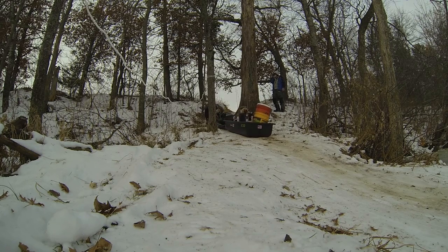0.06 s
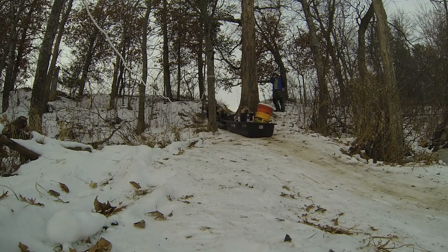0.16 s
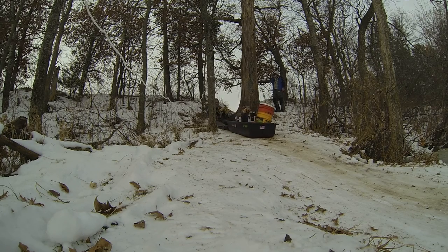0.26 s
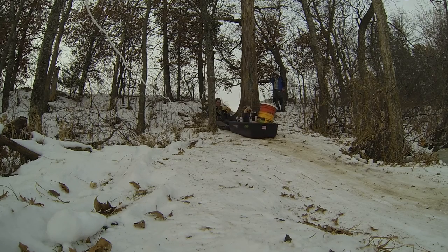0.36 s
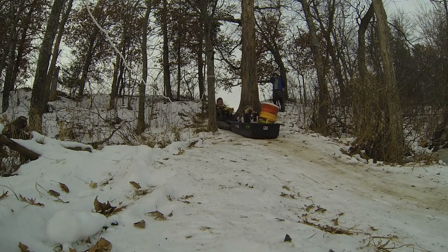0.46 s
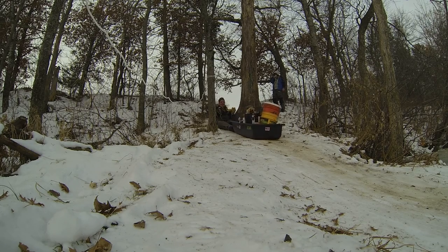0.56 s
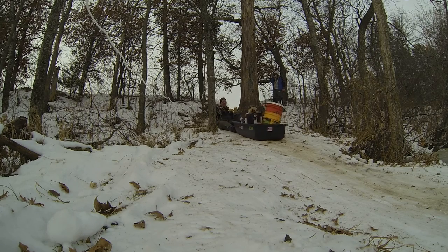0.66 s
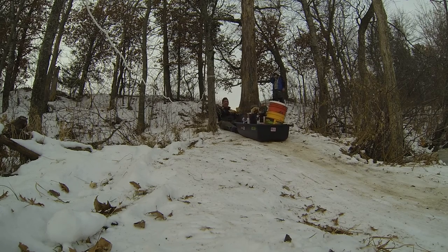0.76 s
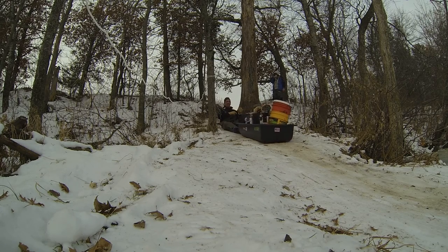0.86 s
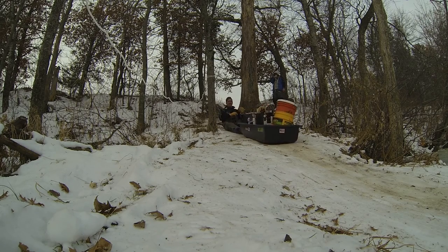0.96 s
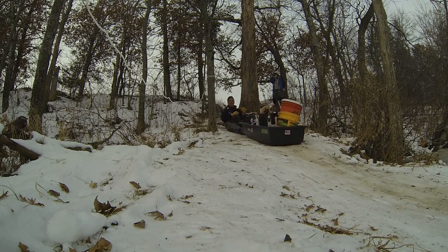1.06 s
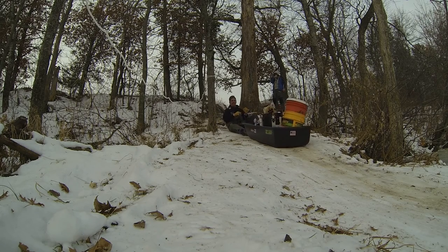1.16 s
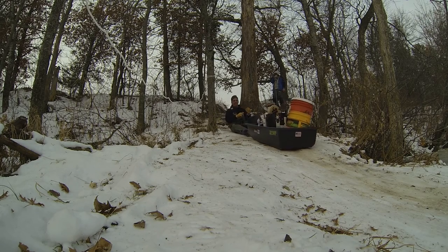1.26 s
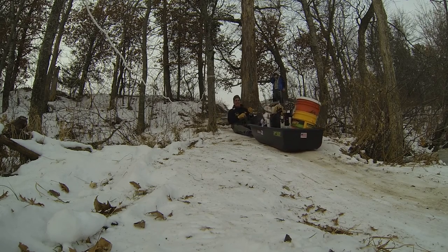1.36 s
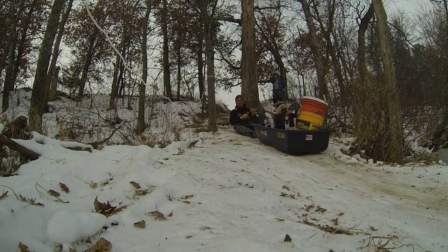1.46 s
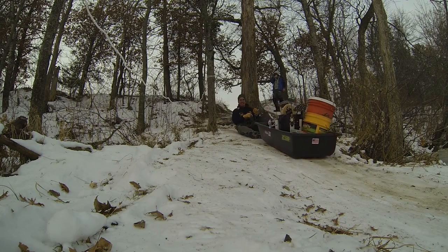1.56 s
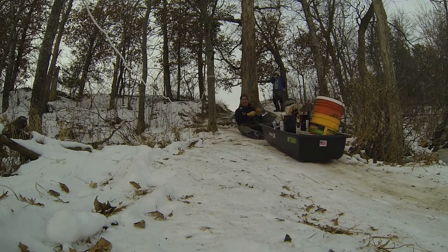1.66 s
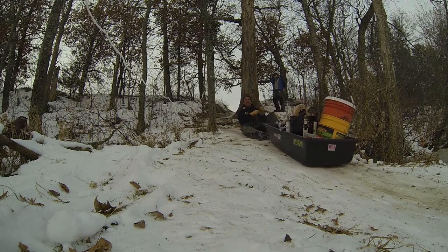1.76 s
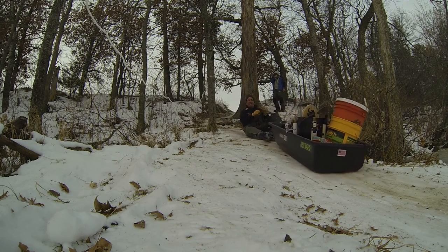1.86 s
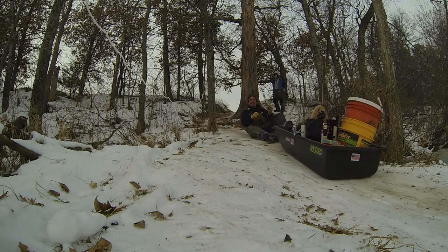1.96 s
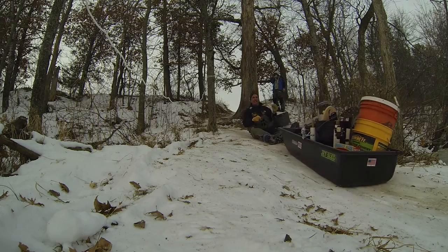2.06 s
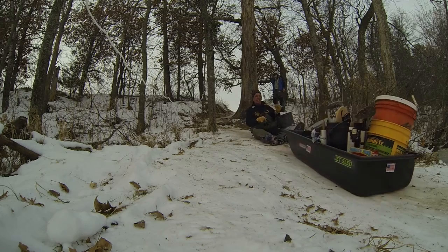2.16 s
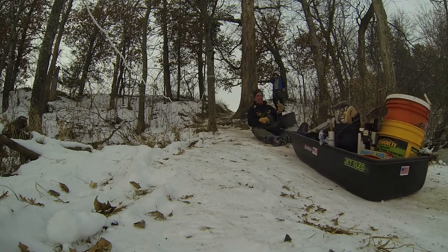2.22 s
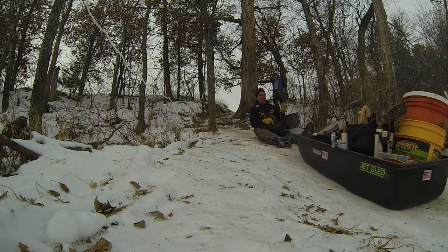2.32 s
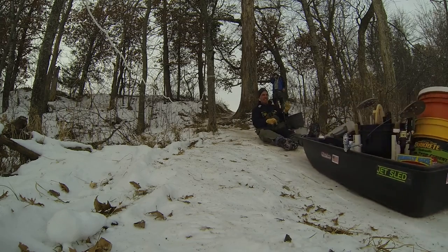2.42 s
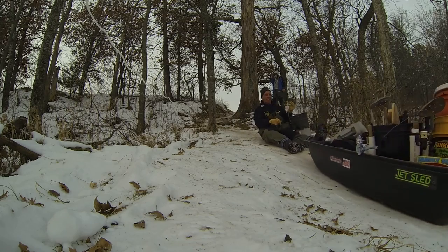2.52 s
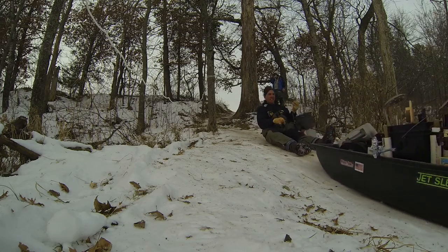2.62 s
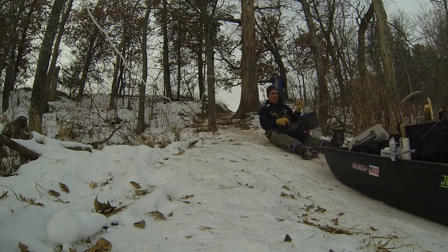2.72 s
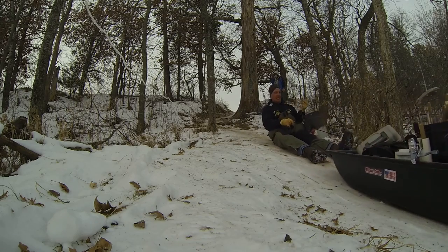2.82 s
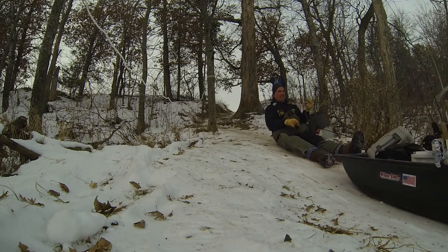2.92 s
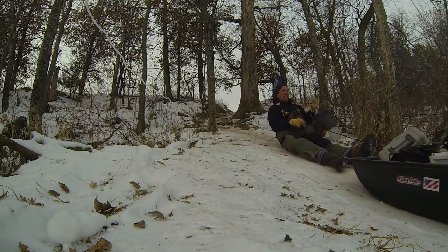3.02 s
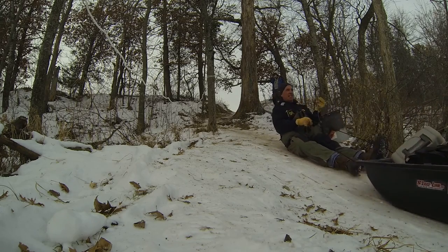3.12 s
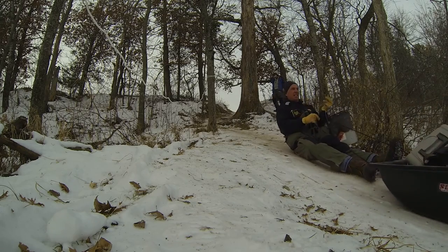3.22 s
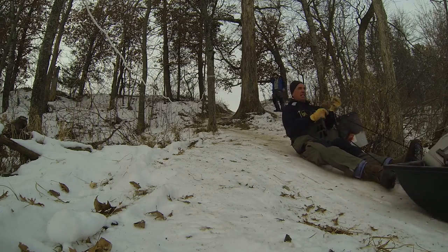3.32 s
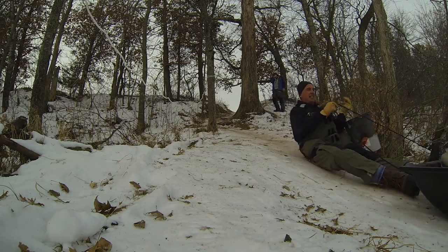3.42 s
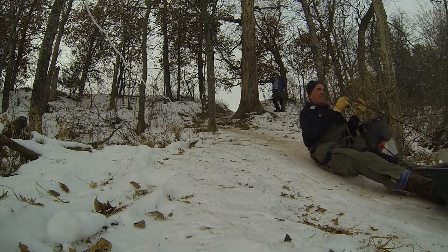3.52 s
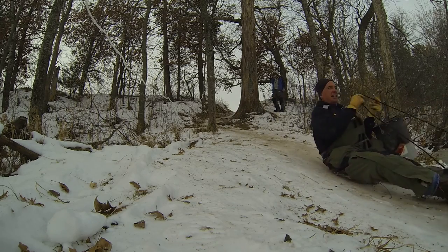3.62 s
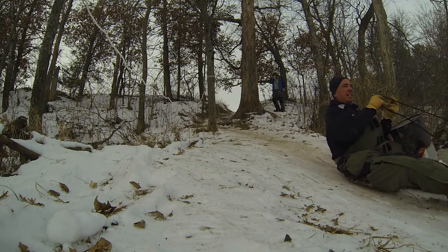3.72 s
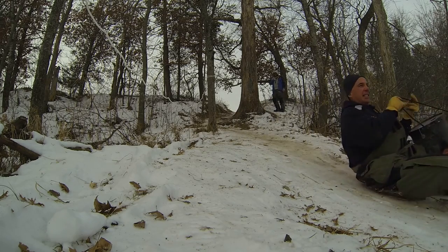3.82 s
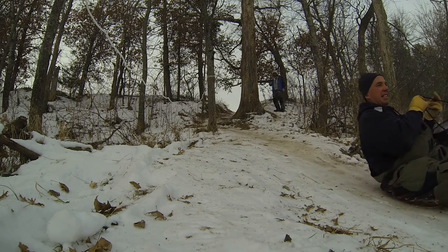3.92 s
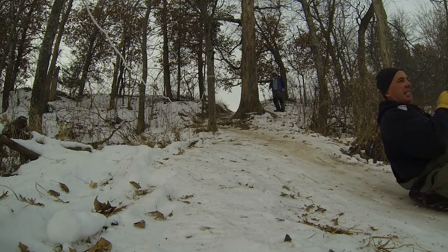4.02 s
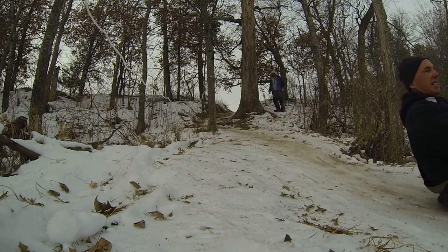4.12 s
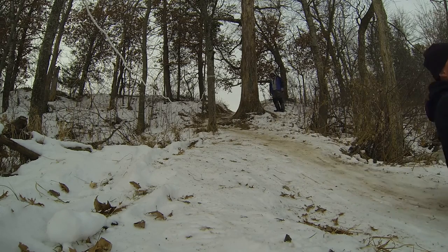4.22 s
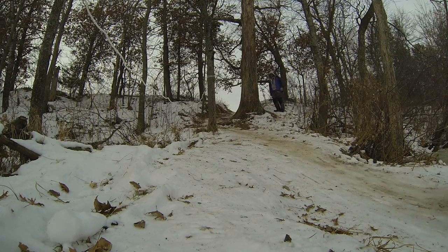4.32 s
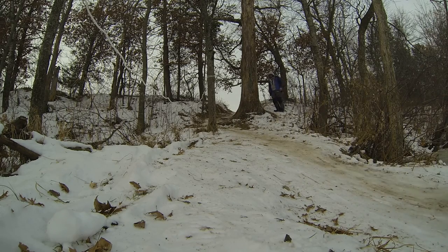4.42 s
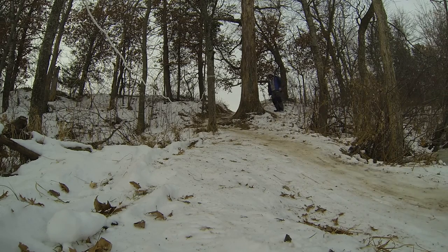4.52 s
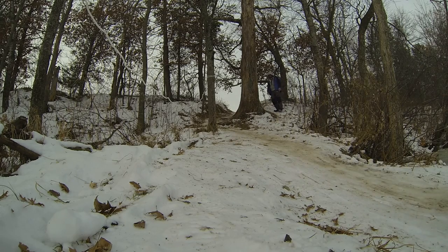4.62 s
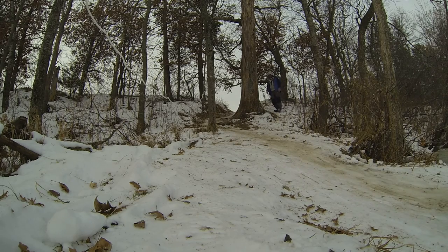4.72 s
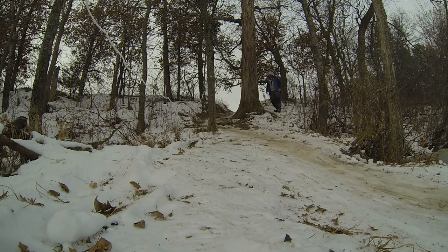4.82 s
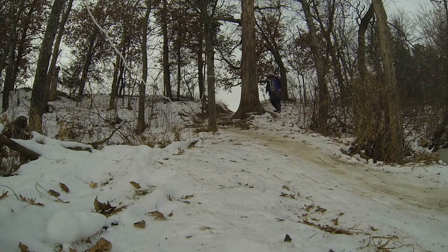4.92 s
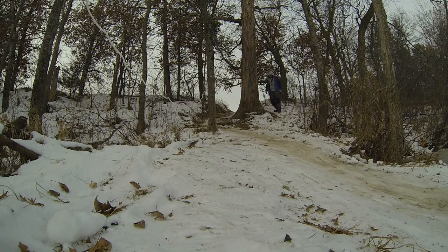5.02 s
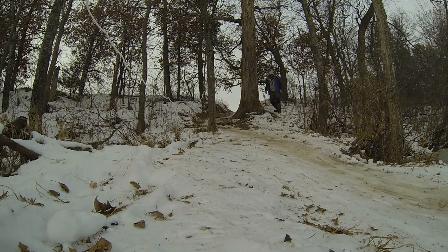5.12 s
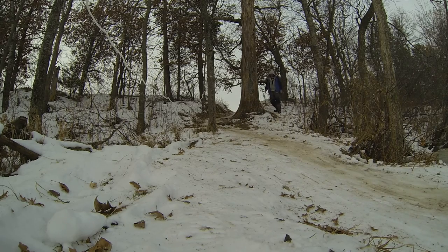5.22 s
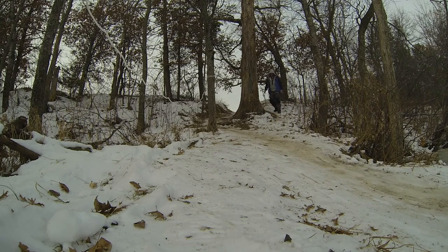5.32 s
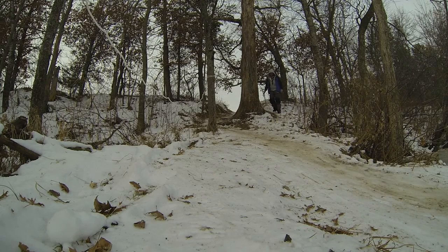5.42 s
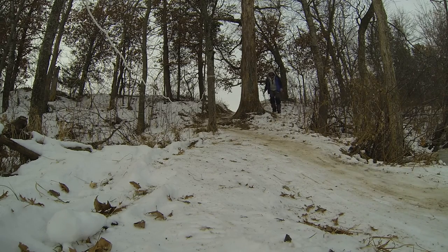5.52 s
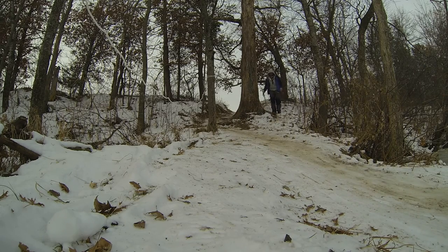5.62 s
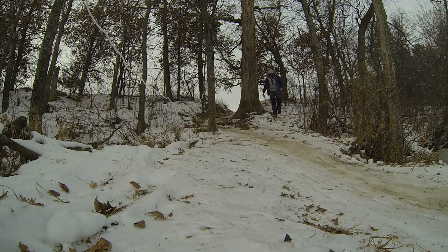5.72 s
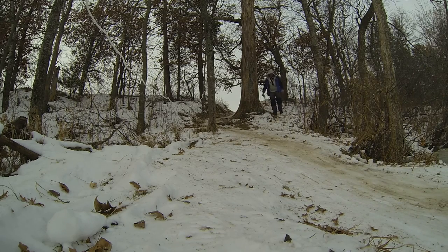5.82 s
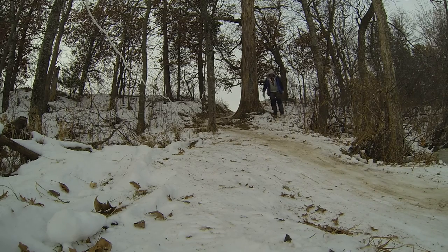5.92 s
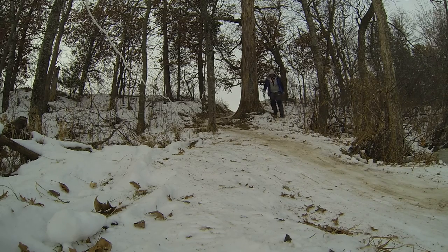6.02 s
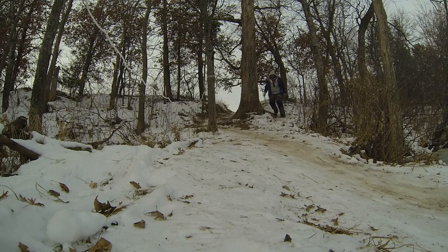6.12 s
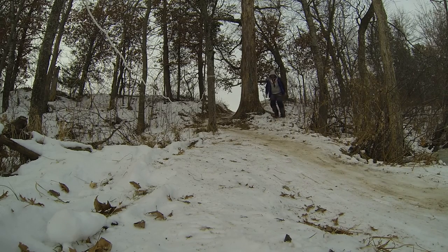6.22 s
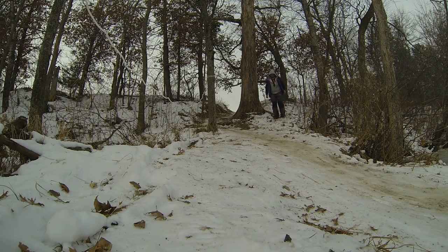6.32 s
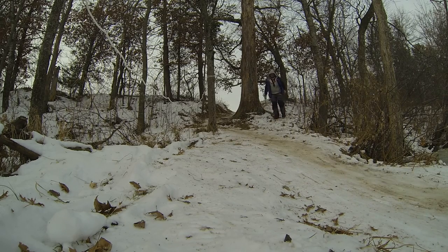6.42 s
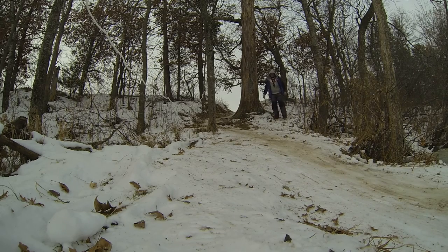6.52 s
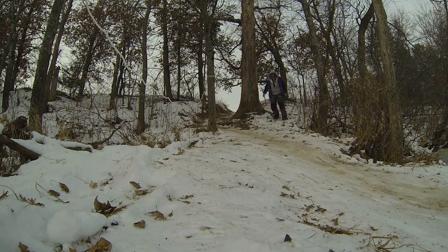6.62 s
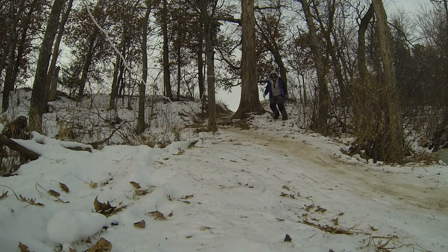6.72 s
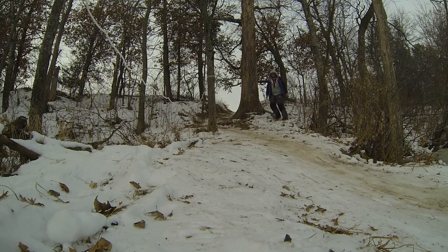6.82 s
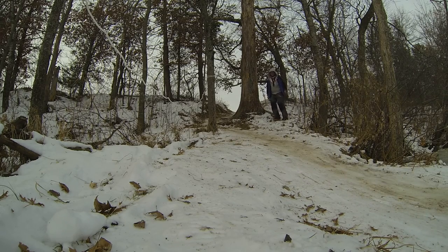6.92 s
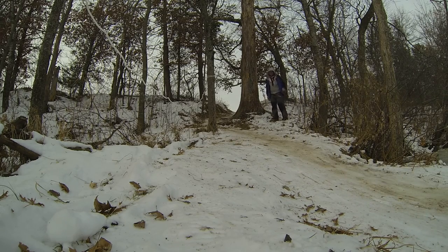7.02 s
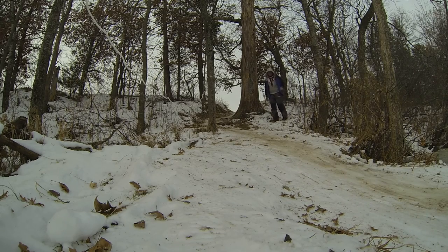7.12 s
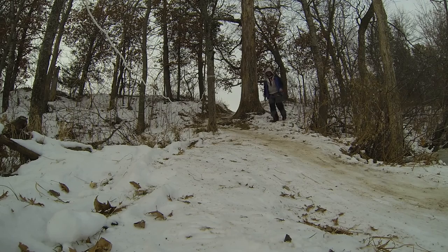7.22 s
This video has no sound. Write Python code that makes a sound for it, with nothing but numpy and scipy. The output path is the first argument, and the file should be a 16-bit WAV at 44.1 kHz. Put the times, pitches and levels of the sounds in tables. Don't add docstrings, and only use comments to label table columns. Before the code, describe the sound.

A sealed, ground-level microphone on a snowy woodland slope gives a boxed, nasal, mono sound over faint hiss, a thin fluttering high whine and low mount rumble. From 0 to 1.7 s a distant loaded plastic tub lurches closer, its hollow hull giving soft low booms under weak grainy scraping. Around 1.7 s it knocks harder and the scrape brightens, growing uneven and crunchy through 2.6 s. From about 2.4 s a sliding rider joins in; the rasp builds steadily, with sharp bumps from 3.2 s. The loudest rush comes at 3.85-4.3 s, a dense cluster of hard knocks in coarse juddering friction. It then recedes, with isolated knocks near 4.4, 4.7 and 5.15 s, and is gone by 5.5 s. Quiet short boot and clothing rubs follow, a small knock at 6.8 s, and slightly stronger crunchy strokes at 7.0-7.3 s.

```python
import sys
import numpy as np
from scipy import signal
from scipy.fft import rfft, irfft
from scipy.io import wavfile
from scipy.ndimage import uniform_filter1d

SR = 44100
rng = np.random.default_rng(int(sys.argv[2]) if len(sys.argv) > 2 else 0)


def int16_out(signal):
    q = np.round(np.clip(np.atleast_2d(signal).T, -1, 1) * 32767)
    wavfile.write(sys.argv[1], SR, q.astype(np.int16))


def gain_from_db(level_db):
    decades = np.asarray(level_db, float) / 20
    return 10 ** decades


N = 320607
HZ = np.arange(8193) * SR / 16384

# frequency in Hz, density in dB per Hz.
FLOOR_SPECTRUM = [(12, -27.5), (20, 1.5), (59, -2.5), (328, -15), (398, -17.5), (674, -20), (818, -20.5),
                  (1270, -22), (1590, -15), (2100, -26), (2850, -25), (8620, -38), (10200, -32),
                  (13400, -43), (15000, -45)]
FLOOR_DB = -61.5
# frequency in Hz, level in dB.
FRAME_LINES = [(9410, -95), (9830, -93), (9890, -94), (10429, -92), (12647, -99), (12707, -102),
               (13127, -101)]
FRAME_HZ = 59.94
# share of the frame 0-1, level in dB, pitch offset in Hz.
WHINE_CHOP = [(0, 3, -69.5), (.08, 4.5, 19.5), (.22, 5.5, -30), (.34, -1, -20.5), (.44, -16, -0.5),
              (.5, -6, 20.5), (.64, 7.5, 90.5), (.7, -2, 20.5), (.75, -23, 0), (.85, -18, -1.5),
              (1, -2, -70)]
WHINE_HZ, WHINE_DB = 9990, -81

# start in seconds, length in seconds, level in dB.
SHAKES = [(0.203, 0.23, -52.5), (0.91, 0.17, -48), (1.144, 0.052, -52), (1.463, 0.071, -51),
          (1.66, 0.186, -50), (1.855, 0.102, -49.5), (2.166, 0.34, -47.5), (2.683, 0.11, -53.5),
          (2.954, 0.032, -56), (3.096, 0.05, -54), (3.363, 0.044, -54), (3.437, 0.042, -56),
          (3.51, 0.11, -46), (3.772, 0.042, -59), (3.856, 0.18, -40.5), (4.084, 0.4, -47),
          (4.543, 0.049, -52), (4.658, 0.08, -48), (4.77, 0.072, -58), (4.86, 0.056, -52.5),
          (6.536, 0.055, -56)]
WALKER_SHAKES = [
    (6.978, 0.073, -58),
    (7.14, .05, -56),
]
SHAKE_ATTACK_DB_PER_S, SHAKE_RELEASE_DB_PER_S, SHAKE_REST_DB = 200, 200, -59.5

# time in seconds, peak in dB.
BOOMS = [(0.04, -54), (0.343, -56), (0.503, -72), (0.607, -50), (0.748, -52), (0.861, -49.5), (0.948, -74),
         (1.098, -48.5), (1.14, -49), (1.248, -50.5), (1.3, -54), (1.466, -58), (1.56, -49.5), (1.786, -49),
         (1.917, -46), (2.04, -53), (2.116, -48), (2.27, -47.5), (2.41, -51.5), (2.49, -53), (2.547, -47.5),
         (2.634, -60), (2.736, -57), (2.841, -68)]
BOOM_HZ, BOOM_T60_S = 157, 0.23

# time in seconds, share of the far tub 0-1, share of the near tub 0-1.
TUB_SHARE = [(0, 0.86, 0), (1.2, 0.57, 0.44), (1.72, 0.07, 0.53), (1.76, 0.15, 0.63), (2.6, 0, 0.6),
             (3.1, 0, 0.64), (3.6, 0.02, 0.28), (4.4, 0.09, 0.04), (5.0, 0.31, 0), (5.5, 0.3, 0),
             (6.9, 0.13, 0), (7.27, 0.15, 0)]
# frequency in Hz, width in Hz, level in dB for far tub, near tub, clothing.
CASE_MODES = [(870, 60, -15, -46, -24), (1320, 170, -20, -1, -15), (1471, 120, 1, 9, -3),
              (1666.5, 118, 1, 5, 0), (2289, 79, -4.5, -6, -8), (2828, 91, -4.5, -17, -9),
              (3035, 150, -4.5, -10, -24), (3650, 280, -28, -31, -21), (4135, 340, -22, -20, -31.5),
              (5170, 400, -14, -11.5, -42.5), (6200, 600, -36, -27.5, -46), (7240, 720, -27, -29, -26.5),
              (10300, 610, -38, -29.5, -34.5), (12300, 670, -34, -34, -57), (13900, 620, -39, -32, -42)]
# frequency in Hz, gain in dB.
CASE_LEAK = [(700, -39), (1500, -51), (3000, -54), (6000, -52), (9000, -59), (14000, -69)]
# frequency in Hz, width in Hz, level in dB for far tub, near tub, clothing.
HULL_MODES = [(96, 8.6, 0, -5.5, 2.5), (156, 24, 3.5, -14, -4), (245, 36.4, 0, 3.5, 4),
              (297, 25, -20, -5.5, -4.5), (369, 64, -15, -12.5, -4.5), (478, 45, -17, -16, -9.5),
              (588, 160, -10, -11.5, -7)]
# frequency in Hz, gain in dB.
HULL_LEAK = [(60, -13.5), (200, -15), (500, -25), (900, -18), (1500, -32)]
NOTCH_HZ, NOTCH_WIDTH_HZ, NOTCH_DEPTH = 1012, 80, 0.63

# time in seconds, peak in dB, bright edge in dB, hull thud in dB.
TUB_KNOCKS = [(0.4556, -50, -61, -42.5), (0.9356, -57, -54, -53), (1.3536, -45, -63, -65),
              (1.736, -30.5, -46, -36), (1.7653, -38, -49, -40), (1.9158, -39, -52, -49),
              (2.104, -30, -45.5, -55), (2.2138, -36, -55, -50), (2.254, -41, -42, -49),
              (2.294, -37, -60, -49), (2.573, -35, -51, -58), (3.0245, -33, -59, -60),
              (3.0395, -41, -46.5, -52)]
RIDER_KNOCKS = [(3.259, -27, -55, -58), (3.4151, -24.5, -55, -54), (3.524, -31, -46, -52),
                (3.6612, -20.5, -54, -60), (3.8467, -21, -48, -52), (3.868, -12, -43, -46),
                (3.8771, -12.5, -50, -43), (3.9269, -24, -40, -42), (3.985, -21, -42, -57),
                (4.0381, -13.5, -34.5, -36), (4.116, -14, -43, -51), (4.1605, -15, -39, -43),
                (4.219, -15, -37.5, -40), (4.2578, -15, -50, -43), (4.287, -15, -48, -28.5),
                (4.4073, -25, -52, -46), (4.6766, -22, -52, -55), (4.988, -33, -63, -59),
                (5.131, -30, -57, -65), (5.141, -25, -62, -69), (5.1613, -16.5, -51, -65),
                (6.8085, -35.5, -58, -70)]
KNOCKS = list(TUB_KNOCKS) + list(RIDER_KNOCKS)
CRACKLE_MS, THUD_MS = 8.1, 12
LIFT_DB, LIFT_S, PRESS_DB, PRESS_S = -1.5, 0.027, 3.0, 0.017

# time in seconds, scrape in dB.
TUB_SLIDE = [
    (0, -78),
    (.85, -67),
    (.93, -61),
    (1.7, -57.5),
    (1.76, -51.5),
    (2.6, -47),
    (2.72, -53.5),
    (3.3, -54.5),
    (3.9, -56),
]
# time in seconds, scrape in dB.
RIDER_SLIDE = [
    (2.4, -62.5),
    (2.9, -47.5),
    (3.8, -36.5),
    (4.05, -32.5),
    (4.29, -34.5),
    (4.34, -37.5),
    (5.1, -48.5),
    (5.22, -52),
    (5.5, -65),
]
# start in seconds, length in seconds, scrape in dB.
STEPS = [(5.56, .03, -58.5), (5.64, 0.034, -54), (5.81, 0.057, -60.5), (5.9, 0.035, -57.5),
         (6.15, 0.071, -64.5), (6.31, 0.33, -62.5), (6.72, 0.22, -63.5), (6.95, .08, -60),
         (7.06, 0.033, -50.5), (7.11, 0.075, -48.5), (7.2, .1, -51.5)]
STEP_ATTACK_DB_PER_S, STEP_RELEASE_DB_PER_S = 300, 125
# dB at the reference scrape, dB per dB of scrape.
TUB_LAYERS = [
    (-59.5, .5),
    (-65, 0.66),
    (-58.5, 0.37),
]
RIDER_LAYERS = [
    (-65, 0.9),
    (-73, 0.87),
    (-64, 1),
]
BOOT_LAYERS = [
    (-59, 1.15),
    (-67, 1.02),
    (-68.5, .4),
]
REFERENCE_DB = -50
# time in seconds, extra level in dB.
PATCHES = [(.2, 0), (.45, 4.5), (.93, 3), (1.2, 1.5), (1.33, -3.5), (1.56, 3), (1.68, -1.5), (1.78, 3.5),
           (1.94, 2.5), (2.06, -2), (2.25, 1), (2.57, 1.5), (2.97, 3), (3.25, -0.5), (3.55, 1.5),
           (3.72, 0.5), (3.9, 0.5), (4.01, 1.5), (4.4, 3.5), (4.47, 1), (4.66, 2.5), (4.78, 1), (4.9, 3)]
PATCH_SHARE = [0.82, 0.93, 0.78, 1.1]
PATCH_S = 0.035


def rms_one(x):
    return x / np.sqrt(np.mean(x ** 2) + 1e-20)


def even(x):
    return x / np.sqrt(uniform_filter1d(x ** 2, size=5000) + 1e-20)


def in_time(rows):
    s, *columns = np.transpose(rows)
    return [np.interp(np.arange(N) / SR, s, c) for c in columns]


def holds(rows, attack, release):
    t = np.arange(N) / SR
    levels = []
    for s, length, db in rows:
        before, after = np.maximum(s - t, 0), np.maximum(t - s - length, 0)
        levels.append(db - attack * before - release * after)
    return gain_from_db(np.max(levels, axis=0))


def band(x, lo_hz, hi_hz):
    return signal.sosfilt(signal.butter(3, [lo_hz, hi_hz], "band", fs=SR, output="sos"), x)


def drift(rate):
    r = np.exp(-80 * np.pi * rate / SR)
    noise = rng.standard_normal(N // 40 + 2002)
    slow = signal.lfilter([1], [1, -2 * r, r * r], noise)[2000:]
    return np.interp(np.arange(N) / 40, np.arange(len(slow)), rms_one(slow))


def slope(points):
    hz, db = np.transpose(points)
    return gain_from_db(np.interp(np.log(HZ + 1), np.log(hz), db))


def peaks(modes, order):
    return sum(gain_from_db(m[order]) / (1 + ((HZ - m[0]) / (m[1] * .78)) ** 2) for m in modes)


def through(x, gain):
    cepstrum = irfft(np.log(gain + 1e-9))
    cepstrum[1:8192] *= 2
    cepstrum[8193:] = 0
    response = irfft(np.exp(rfft(cepstrum)))[:8192]
    return signal.fftconvolve(x, response)[:N]


def bodies(x, modes, leak):
    far, near = np.clip(in_time(TUB_SHARE), 0, 1)
    clothing = np.maximum(1 - far - near, 0)
    notch = 1 - np.clip(NOTCH_DEPTH, 0, .9) / (1 + ((HZ - NOTCH_HZ) / NOTCH_WIDTH_HZ) ** 2)
    a, b, c = (through(x, notch * (peaks(modes, order=k) + slope(leak))) for k in (2, 3, 4))
    return far * a + near * b + clothing * c


def electronics():
    frames = np.arange(N) / SR * FRAME_HZ
    floor = through(rng.standard_normal(N), slope(FLOOR_SPECTRUM))
    floor = floor / np.std(band(floor, 64, 15000)) * gain_from_db(FLOOR_DB)
    lines = sum(gain_from_db(db + 1.0) * np.sin(2 * np.pi * round(hz / FRAME_HZ) * frames) for hz, db in FRAME_LINES)
    share, chop_db, offset = np.transpose(WHINE_CHOP)
    jump = np.exp(-((frames % 15 - 10.4) / .45) ** 2)
    wander = 32.3 * drift(12) + 81.0 * drift(60)
    pitch = WHINE_HZ + np.interp(frames % 1, share, offset) + wander + 350.0 * jump
    level = gain_from_db(WHINE_DB + 4 + np.interp(frames % 1, share, chop_db) - 8.0 * jump)
    return floor + lines + level * np.sin(2 * np.pi * np.cumsum(pitch) / SR)


def wobble():
    pitch = 44 + 2.86 * drift(5.7)
    ring = np.sin(2 * np.pi * np.cumsum(pitch) / SR) * gain_from_db(1.2 * drift(6.5) + 0.5)
    rumble = rms_one(band(rng.standard_normal(N), 18, 69.5))
    shakes = holds(list(SHAKES) + list(WALKER_SHAKES), SHAKE_ATTACK_DB_PER_S, SHAKE_RELEASE_DB_PER_S)
    return (0.57 * ring + 0.34 * rumble) * (shakes + gain_from_db(SHAKE_REST_DB))


def booms():
    clicks = np.zeros(N) + 1e-18
    for s, db in BOOMS:
        clicks[round(s * SR)] = gain_from_db(db + 2.0)
    r, w = gain_from_db(-60 / (BOOM_T60_S * SR)), 2 * np.pi * BOOM_HZ / SR
    ringing = signal.lfilter([0, np.sin(w)], [1, -2 * r * np.cos(w), r * r], clicks)
    return band(ringing, 110, 257)


def knocks():
    size = 4000
    tail_ms = np.arange(size) / SR * 1000
    click = tail_ms == 0
    kicks = np.zeros((3, N + size))
    for s, peak_db, edge_db, thud_db in KNOCKS:
        at = round(s * SR)
        fresh = rng.standard_normal(size)
        crackle = fresh * np.exp(-tail_ms / CRACKLE_MS) * np.minimum(tail_ms / 2.3, 1)
        lump = gain_from_db(-24) * fresh * np.exp(-tail_ms / THUD_MS) + 0.3 * click
        kicks[0, at:at + size] += gain_from_db(peak_db) * (gain_from_db(-30) * crackle + click)
        kicks[1, at:at + size] += gain_from_db(edge_db) * crackle
        kicks[2, at:at + size] += gain_from_db(thud_db) * lump
    body = band(bodies(kicks[0, :N], CASE_MODES, CASE_LEAK), 910, 1960)
    edge = band(bodies(kicks[1, :N], CASE_MODES, CASE_LEAK), 2660, 12400)
    thud = band(bodies(kicks[2, :N], HULL_MODES, HULL_LEAK), 144, 810)
    return gain_from_db(24.0) * body + gain_from_db(22.5) * edge + gain_from_db(35) * thud


def pressure_db():
    since = np.arange(N) / SR - np.array(KNOCKS)[:, :1]
    lift = np.exp(np.minimum(since, 0) / LIFT_S) * (since < 0)
    press = np.exp(-np.maximum(since, 0) / PRESS_S) * (since >= 0)
    return LIFT_DB * lift.max(axis=0) + PRESS_DB * press.max(axis=0)


def patches_db():
    s, db = np.transpose(PATCHES)[:, :, None]
    swells = db * np.exp(-((np.arange(N) / SR - s) / PATCH_S) ** 2)
    return np.outer(PATCH_SHARE, np.sum(swells, axis=0))


def slider_db(rows, load_db):
    t = np.arange(N) / SR
    outside = np.maximum(t - rows[-1][0], 0) + np.maximum(rows[0][0] - t, 0)
    return in_time(rows)[0] - 60 * outside + load_db


def sliding_db():
    power, load_db = 0, pressure_db()
    tub, rider = slider_db(TUB_SLIDE, load_db), slider_db(RIDER_SLIDE, load_db)
    boots = 20 * np.log10(holds(STEPS, STEP_ATTACK_DB_PER_S, STEP_RELEASE_DB_PER_S) + 1e-9)
    for db, layers in [(tub, TUB_LAYERS), (rider, RIDER_LAYERS), (boots, BOOT_LAYERS)]:
        others = [ref_db + follow * (db - REFERENCE_DB) for ref_db, follow in layers]
        power = power + gain_from_db([db] + others) ** 2
    return uniform_filter1d(10 * np.log10(power) + patches_db(), size=700, axis=1)


def grains(per_s, spread_db, smooth):
    sizes = gain_from_db(spread_db * np.minimum(rng.exponential(1, N), 4)) * rng.choice([-1, 1], N)
    breaks = rng.random(N) < per_s / SR
    return rms_one(sizes * breaks) + smooth * rng.standard_normal(N)


def hull(drum_db):
    lumps = grains(250, spread_db=3.0, smooth=1.3) * gain_from_db(1.6 * drift(6.5))
    x = bodies(lumps, HULL_MODES, HULL_LEAK)
    return even(band(x, 63, 960)) * gain_from_db(drum_db + 1.0)


def flicker(x, edges_hz, depth_db, rate):
    return sum(band(x, lo, hi) * gain_from_db(depth_db * drift(rate)) for lo, hi in zip(edges_hz[:-1], edges_hz[1:]))


def scrape(scrape_db, crunch_db, hiss_db):
    judder = 0.41 * drift(19) + 1.0 * drift(36.0)
    x = bodies(grains(2500, spread_db=2.0, smooth=1.5) * gain_from_db(judder), CASE_MODES, CASE_LEAK)
    low = band(x, 734, 2220)
    crunch = flicker(x, [2100, 2550, 3350, 4500], 1.2, 12)
    hiss = flicker(x, [4500, 6200, 8800, 11300, 16000], 1.5, 10)
    return even(low) * gain_from_db(scrape_db - 0.34) + even(crunch) * gain_from_db(crunch_db + 1.6) + even(hiss) * gain_from_db(hiss_db - 0.4)


def scene():
    scrape_db, crunch_db, hiss_db, drum_db = sliding_db()
    background = electronics() + wobble()
    sled = booms() + knocks() + hull(drum_db) + scrape(scrape_db, crunch_db, hiss_db)
    return (background + sled)[None]


def low_pass(x):
    return signal.sosfilt(signal.butter(12, 15170, fs=SR, output="sos"), x)


def record(dry):
    mix = signal.sosfilt(signal.butter(6, 14500, fs=SR, output="sos"), dry)
    return low_pass(mix)


dry = scene()
out = record(dry)
int16_out(out)
```